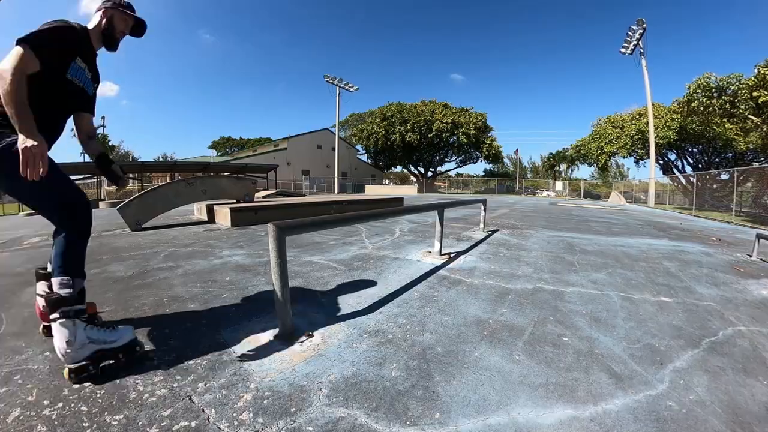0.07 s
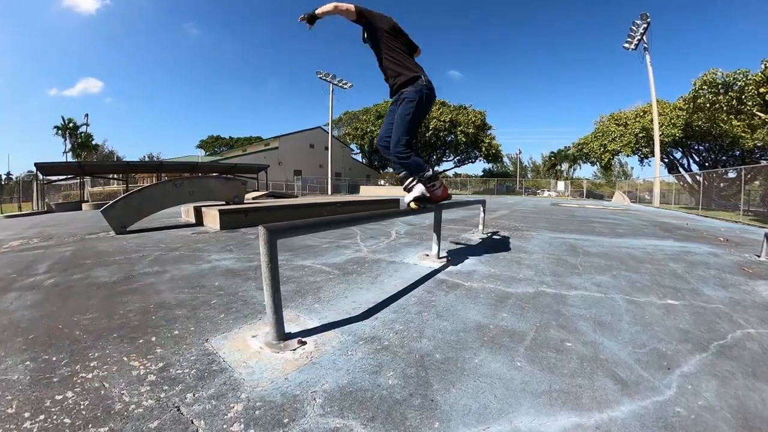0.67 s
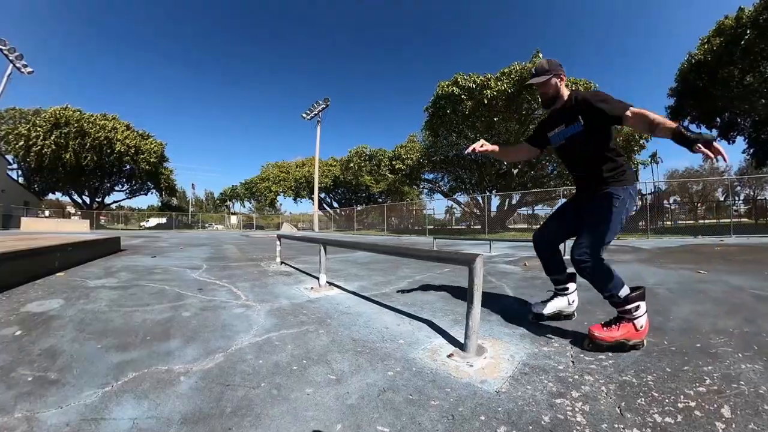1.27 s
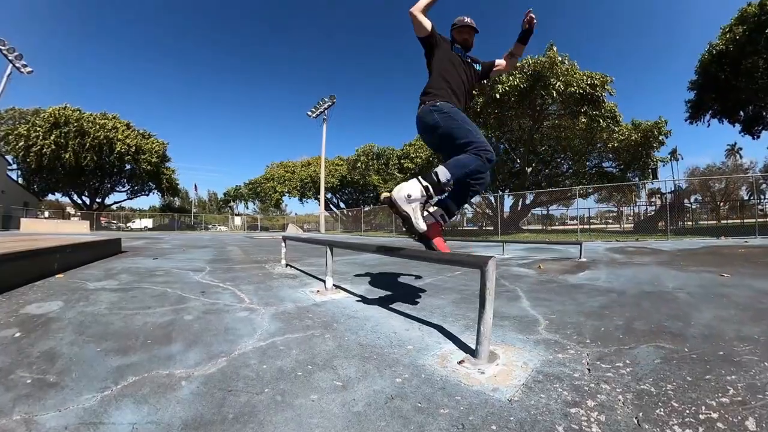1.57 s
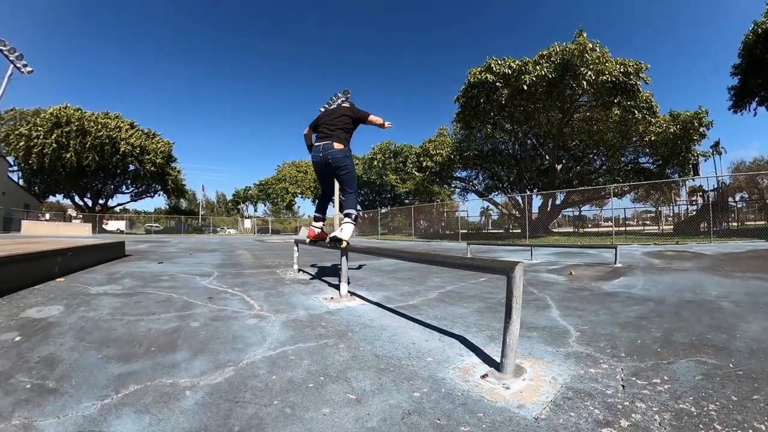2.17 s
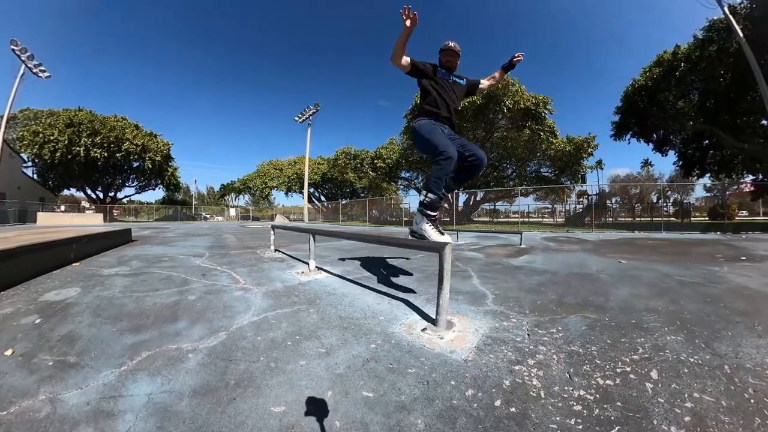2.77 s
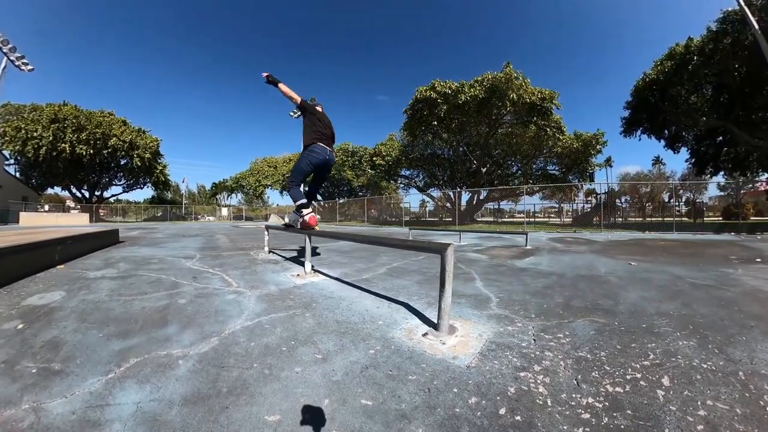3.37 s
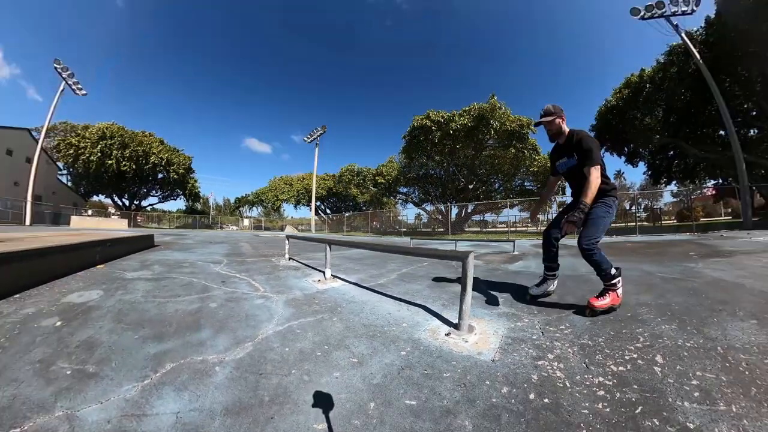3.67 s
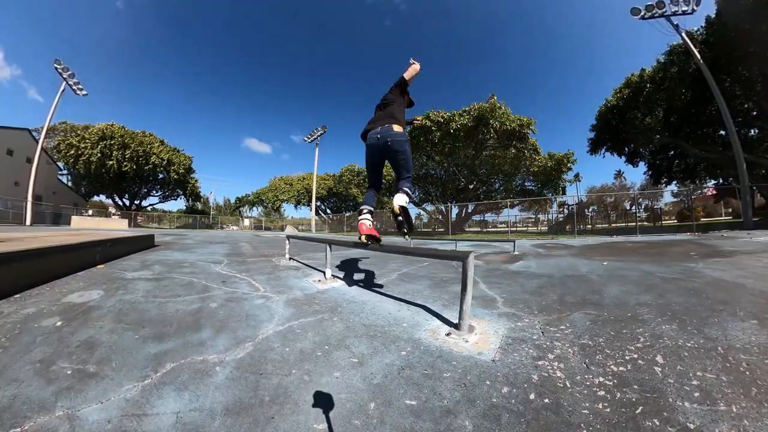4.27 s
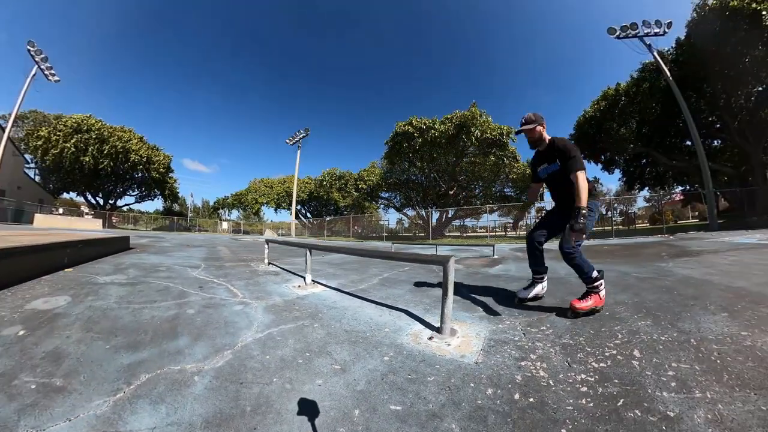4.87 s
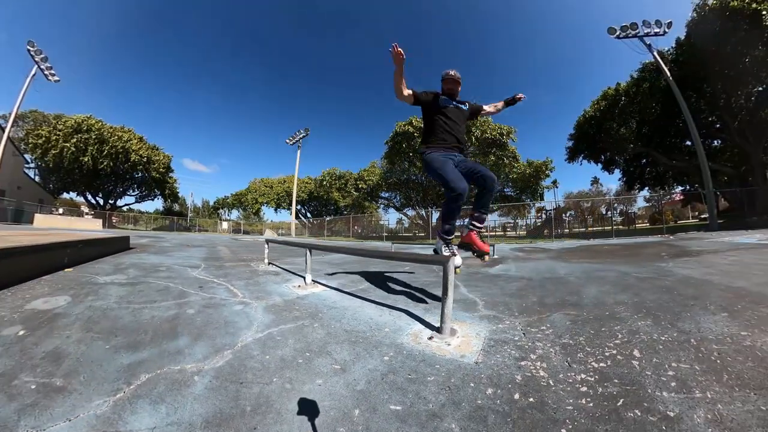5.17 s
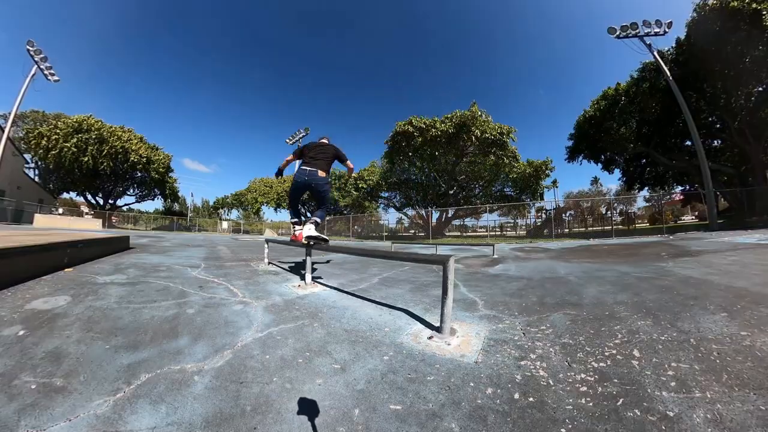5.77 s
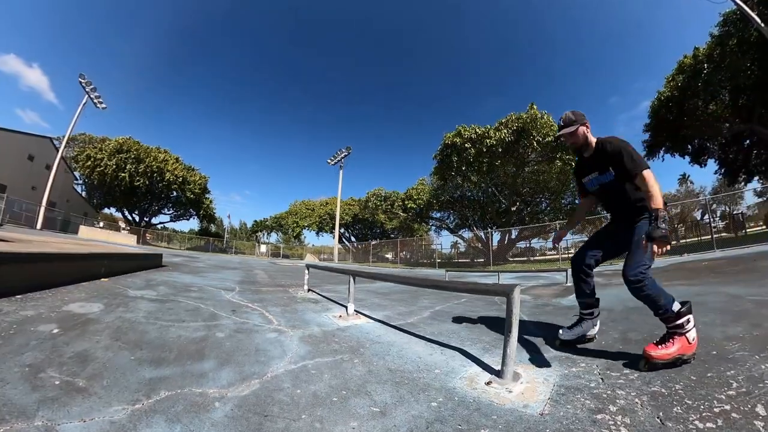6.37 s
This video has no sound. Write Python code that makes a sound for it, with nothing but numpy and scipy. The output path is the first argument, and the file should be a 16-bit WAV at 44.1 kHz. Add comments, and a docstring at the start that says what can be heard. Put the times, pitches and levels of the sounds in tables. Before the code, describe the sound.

Wind rumbles on the microphone as inline skates repeatedly hiss over concrete, thud onto a metal rail and scrape along it, sometimes squealing.

```python
"""An inline skater makes pass after pass at a steel rail in a windy concrete skatepark, in hard cuts.
Wind buffets the microphone throughout. Wheels hiss closer over gritty concrete and clack at take-off.
The skates thud onto the pipe, which rings, and grind along it while the free wheels spin.
From the second pass on, the soles also squeal in stick-slip.
A distant engine drones under the fifth pass and a last run-up."""
import sys
import numpy as np
from scipy import signal
from scipy.fft import rfft, irfft, next_fast_len
from scipy.io import wavfile

SR = 44100
rng = np.random.default_rng(int(sys.argv[2]) if len(sys.argv) > 2 else 0)


def master_out(mix):
    """Clip the mix to full scale and print it as 16-bit PCM to the path in sys.argv[1]."""
    frames = np.transpose(np.atleast_2d(mix))
    ceiling = np.clip(frames, -1, 1)
    pcm = np.round(ceiling * 32767).astype(np.int16)
    wavfile.write(sys.argv[1], SR, pcm)


N = 292383
TIME_S = np.arange(N) / SR

# Pass boundaries: time_s
CUTS_S = [0.075, 1.107, 2.338, 3.607, 4.873, 5.938, 6.7]
# One run-up a pass: jump_s, closest_db, approach_db_per_s, fizz_db, background_db
RUN_UPS = [(0.49, -44, 36, -9.5, -47.5), (1.56, -44, 51, -4.5, -52.5), (2.788, -38.5, 41, 0.5, -41.5),
           (4.071, -42, 72, -7.5, -52.5), (5.259, -43, 55, -5.5, -52), (6.8, -32.5, 37.5, -4, -38)]
# Wheels on concrete: freq_hz, level_db
ROLL_SPECTRUM = [(100, -1.5), (300, 0.5), (450, -4.5), (700, -7.5), (1100, -6.5), (1600, -7), (2200, -10),
                 (3100, -14.5), (4500, -23), (6600, -30.5), (7400, -37), (9000, -42), (13000, -62.5),
                 (15500, -82)]
# Skate set down to push off: start_s, level_db, t60_s
PUSH_OFF = (5.95, -33.5, 0.86)
# Wind strength: time_s, level_db
WIND_LEVELS = [(0.1, -41.5), (0.44, -34), (0.57, -45), (0.68, -35), (0.95, -42.5), (1.41, -27),
               (2.3, -41.5), (2.44, -21.5), (2.75, -33.5), (2.79, -19.5), (2.82, -28.5), (3.35, -27.5),
               (3.82, -40), (4.0, -27), (4.53, -36.5), (5.44, -35.5), (6.04, -23), (6.62, -29.5)]
# Large eddies: freq_hz, level_db
BUFFET_SPECTRUM = [(10, 1.5), (25, -0.5), (60, 0), (100, -3.5), (150, -14), (250, -32.5), (500, -85),
                   (2000, -110)]
# Gusts and wake: freq_hz, level_db
FLUTTER_SPECTRUM = [(60, -5), (130, 1.5), (190, -2), (280, -14.5), (450, -26.5), (900, -31), (2000, -65),
                    (6000, -110)]
# Unweighted frame taps: contact_s, level_db, pitch_hz, crack_db, t60_s
FRAME_TAPS = [(0.198, -29, 1550, -30, 0.02), (0.787, -27, 1170, -7, 0.017),
              (1.022, -37.5, 1300, -8.5, 0.015), (2.688, -28, 2150, 1, 0.023),
              (3.143, -12.5, 2690, -6, 0.012), (4.304, -20.5, 1800, -17, 0.022),
              (4.532, -12.5, 1100, -21, 0.0048), (4.568, -24.5, 1100, -11, 0.011),
              (4.745, -12, 1120, -31, 0.025)]
# Skates lifting in turn: first_s, second_s, first_db, second_db, pitch_hz, crack_db, wake_db
JUMPS = [(0.415, 0.471, -21, -19, 1287, -33, -46), (1.456, 1.515, -25, -22, 1260, -20.5, -41),
         (2.726, 2.784, -14.5, -23, 1593, -19.5, -37), (3.997, 4.053, -26, -22, 1220, -17, -25.5),
         (5.176, 5.242, -24, -22, 1380, -22, -49)]
# Skate resonances: pitch_ratio, level_db
SKATE_MODES = [(.8, -8), (1, 0), (1.2, -4), (1.42, -7), (1.9, -8)]
# First contact: freq_hz, level_db
CRACK_SPECTRUM = [(300, -29), (1000, 10.5), (2300, 13.5), (3500, 1.5), (4800, -1), (5900, -1.5),
                  (7200, -10), (10000, -32), (15000, -66)]
# Skate onto pipe: contact_s, clack_db, pitch_hz, crack_db, t60_s, thud_db,
# ring_db, tilt_db_per_octave, lift_hz, lift_db
RAIL_LANDINGS = [(0.762, -15, 950, -8, 0.022, -18.5, -27, -1, 745, 3),
                 (0.796, -19.5, 2350, -2, 0.028, -26, -22.5, -1, 1120, 5.5),
                 (1.796, -20.5, 840, -14, 0.014, -17.5, -26, -2.5, 3050, 10),
                 (1.855, -11.5, 2000, -11.5, 0.0091, -16.5, -21.5, -0.5, 3370, 9),
                 (1.968, -14, 1980, -9, 0.023, -38, -25, 1.5, 970, 9),
                 (2.967, -8, 1754, -12.5, 0.011, -7.5, -26, -4.5, 1390, -2),
                 (3.204, -17, 1040, -4, 0.028, -6.5, -16.5, 2.5, 1210, 5),
                 (3.381, -18.5, 1410, -3, 0.044, -14.5, -22, 2, 1400, 1),
                 (4.318, -13, 1120, -22, 0.027, -11.5, -19.5, 0, 3100, 7.5),
                 (4.583, -21, 1200, -19, 0.016, -22, -30.5, -4, 1100, 0),
                 (4.675, -25.5, 2630, -9.5, 0.012, -42, -32.5, -1, 2500, 0),
                 (4.713, -22, 2290, -4, 0.028, -27, -21.5, -2, 910, 6),
                 (4.729, -17, 1770, -17, 0.022, -17.5, -20, -1, 910, 1),
                 (5.498, -27, 1000, -14, 0.02, -31, -31.5, -13, 780, 18),
                 (5.528, -13, 1801, -22, 0.02, -19, -22, 2, 2993, 8.5),
                 (5.63, -21.5, 1840, -6, 0.025, -27, -20.5, 0.5, 1330, 9.5),
                 (5.647, -10.5, 1350, -11.5, 0.0092, -28, -22.5, 0, 1440, 8)]
# Boots and posts after landing: freq_hz, level_db
SHUDDER_SPECTRUM = [(30, -12), (90, -5.5), (170, 2.5), (280, -8), (450, -22), (900, -39), (4000, -92)]
# Strong pipe modes: freq_hz, level_db, t60_s
PIPE_MODES = [(368, 3, .36), (468, -3, .42), (527, -5, .35), (596, -4, .35), (764, -1, .38), (932, 1, .36),
              (1123, -1, .36), (1312, -3, .38), (1406, -2, .36), (1532, 1, .34), (1815, -1, .34),
              (1906, -2, .28), (2064, -7, .34), (2405, -6, .3), (2449, -7, .3), (2996, -6, .4),
              (3022, -3, .47), (3114, -7, .45), (3273, -6, .42), (3332, -4, .38), (3432, -7, .4),
              (3758, -10, .4), (4226, -8, .3), (4294, -7, .33), (4706, -13, .4), (5138, -13, .35),
              (5250, -12, .35), (6072, -11, .28), (6416, -10, .28), (8438, -20, .42)]
# Weak pipe modes: freq_hz, level_db
WEAK_MODE_SPECTRUM = [(150, -12), (200, 11), (330, -0.5), (600, 3.5), (950, 15.5), (1600, 4.5), (2300, 3.5),
                      (3300, -4.5), (4200, 0.5), (4520, -7.5), (5200, -4.5), (6400, -10.5), (7900, -25),
                      (8500, -19), (11000, -41), (15500, -61)]
# Their decay: freq_hz, t60_s
WEAK_MODE_DECAY = [(200, 0.36), (1000, 0.13), (3200, 0.35), (6000, 0.27), (12000, 0.51)]
# Sole on steel: freq_hz, level_db
SCRAPE_SPECTRUM = [(100, -9), (250, 2), (600, -1), (1300, -2.5), (2200, -5.5), (3200, -1.5), (4500, -12),
                   (6500, -20.5), (8000, -27.5), (11000, -32.5), (15500, -60)]
# Slides along the pipe: start_s, slide_db, fade_db_per_s, bite_db, spin_db
SLIDES = [(0.774, -46, 14, -22.5, -56), (1.801, -39.5, 30, -24, -53), (2.97, -30.5, 21.5, -43, -47),
          (4.303, -40.5, 28, -26.5, -59), (4.705, -52, 30, -26, -67.5), (5.5, -34.5, 36, -46, -55)]
# Free-spinning wheels: freq_hz, level_db
BEARING_SPECTRUM = [(1500, -4), (4000, 1), (6500, -5.5), (7400, -8), (9000, -17), (11000, -22),
                    (15500, -50)]
# Sole chatter on the pipe wall: start_s, level_db, t60_s
SOLE_SQUEALS = [(1.815, -34, 0.49), (1.912, -31, 0.21), (2.006, -25.5, 0.36), (3.489, -45, 1),
                (4.432, -40, 0.39), (4.801, -39.5, 0.6), (5.535, -38, 0.45)]
# Distant engine: time_s, pitch_hz, level_db
ENGINE_TRACK = [(4.86, 113, -63), (4.89, 112.4, -32.5), (5.1, 115.4, -31.5), (5.35, 114.7, -31.5),
                (5.65, 115.4, -28), (5.9, 116, -33), (6.1, 112.5, -31), (6.4, 111, -28),
                (6.63, 110.5, -32.5)]

WALL_HZ, BUILD_S = 3060, 0.014  # pipe wall resonance; swell after a landing
RUB_LEAD_S = 1 / 20


def gain_of(db):
    """Decibels to amplitude."""
    return 10 ** (np.asarray(db) / 20)


def unit_rms(x):
    """Scales to rms 1."""
    return x / np.sqrt(np.mean(x ** 2) + 1e-20)


def value_at(spectrum, hz):
    """Interpolates on a log frequency axis."""
    freq_hz, value = np.transpose(spectrum)
    return np.interp(np.log(hz + 1), np.log(freq_hz + 1), value)


def coloured(x, spectrum):
    """Filters x by (freq_hz, level_db) points; rms 1."""
    size = next_fast_len(len(x))
    gains = gain_of(value_at(spectrum, np.fft.rfftfreq(size, 1 / SR)))
    return unit_rms(irfft(rfft(x, size) * gains, size)[:len(x)])


def noise(spectrum, samples=N):
    """Coloured noise, rms 1."""
    return coloured(rng.standard_normal(samples), spectrum)


def add(mix, start_s, sound):
    """Mixes a sound in, cut off at the end of its pass."""
    end_s = next(cut_s for cut_s in CUTS_S if cut_s > start_s)
    part = mix[round(start_s * SR):round(end_s * SR)][:len(sound)]
    part += sound[:len(part)]


def grit(rate_per_s, spread_db, share=0.7):
    """Smooth friction noise plus tiny impacts of uneven size."""
    sizes = gain_of(spread_db * np.minimum(rng.exponential(1, N), 4)) * rng.choice([-1, 1], N)
    smooth = rng.standard_normal(N)
    impacts = unit_rms(sizes * (rng.random(N) < rate_per_s / SR))
    return unit_rms(smooth + share * impacts)


def wheels(level_db=1, patchy_db=0.85, fizz_boost_db=11, closest_lead_s=0.14, lift_db_per_s=308):
    """Wheels crunch over patchy concrete, louder as they near, until the jump."""
    out = np.zeros(N)
    crunch = grit(rate_per_s=900, spread_db=4)
    patches = noise([(0, 0), (60, 0), (200, -30), (800, -90)])
    rolling = coloured(crunch * gain_of(patchy_db * patches), ROLL_SPECTRUM)
    treble = signal.sosfiltfilt(signal.butter(2, 3500, "highpass", fs=SR, output="sos"), rolling)
    body, fizz = rolling - treble, gain_of(fizz_boost_db) * treble
    for start_s, end_s, run_up in zip(CUTS_S, CUTS_S[1:], RUN_UPS):
        jump_s, closest_db, approach_db_per_s, fizz_db, background_db = run_up
        span = (TIME_S >= start_s) & (TIME_S < end_s)
        t = TIME_S[span]
        distance_db = approach_db_per_s * np.maximum(jump_s - closest_lead_s - t, 0)
        near = gain_of(closest_db - distance_db - lift_db_per_s * np.maximum(t - jump_s, 0))
        body_gain = np.hypot(near, gain_of(background_db))
        fizz_gain = np.hypot(near * gain_of(fizz_db), gain_of(background_db - 8.5))
        add(out, start_s, body_gain * body[span] + fizz_gain * fizz[span])
    start_s, db, t60_s = PUSH_OFF
    t = TIME_S[:SR]
    push = (body + gain_of(-2) * fizz)[:SR]
    add(out, start_s, push * gain_of(db - 60 * t / t60_s) * np.minimum(t / 0.043, 1))
    return gain_of(level_db) * out


def wind(buffet_db=2, flutter_db=-8, gust_db=2, usual_db=-30, wake_lag_s=0.015, wake_width_s=0.11):
    """Large eddies thump the microphone; gusts and the skater's wake add quicker flutter."""
    db = np.interp(TIME_S, *np.transpose(WIND_LEVELS))
    gusts = gain_of(gust_db * noise([(0, -30), (4, -12), (8, 0), (16, 0), (40, -30), (200, -100)]))
    wake = sum(gain_of(wake_db) * np.exp(-((TIME_S - jump_s - wake_lag_s) / wake_width_s) ** 2)
               for _, jump_s, *_, wake_db in JUMPS)
    breeze = gain_of(usual_db + 0.65 * (db - usual_db) + flutter_db)
    buffet = gain_of(db + buffet_db) * noise(BUFFET_SPECTRUM)
    flutter = np.hypot(breeze, wake) * noise(FLUTTER_SPECTRUM)
    return (buffet + flutter) * gusts * np.clip((TIME_S - CUTS_S[0]) / .01, 0, 1)


def rub(db, hz, lead_t60_s, fade_t60_s=0.045):
    """Urethane scrubs as the wheels load and unload; peaks RUB_LEAD_S in."""
    lead = round(RUB_LEAD_S * SR)
    t = np.arange(-lead, lead) / SR
    band = [(hz * .06, -45), (hz * .25, -18), (hz * .7, -5), (hz * 1.2, 0),
            (hz * 1.8, -5), (hz * 3.5, -19), (hz * 9, -52)]
    return gain_of(db - 60 * np.maximum(-t / lead_t60_s, t / fade_t60_s)) * noise(band, len(t))


def clack(db, hz, crack_db, knock_db, t60_s, max_t60_s=0.026, crack_t60_s=0.014, boot_hz=687):
    """Hard plastic: damped modes, a hollow boot knock, a rough crack on top."""
    t = np.arange(int(.06 * SR)) / SR

    def at_onset(x, onset_db):
        """Sets the rms of the first 2 ms."""
        return gain_of(onset_db) * x / np.sqrt(np.mean(x[t < .002] ** 2))

    damping = gain_of(-60 * t / min(t60_s, max_t60_s))
    # neighbouring modes oppose, so the sound takes a cycle to open
    body = damping * sum((-1) ** k * gain_of(mode_db) * np.sin(2 * np.pi * hz * ratio * t)
                         for k, (ratio, mode_db) in enumerate(SKATE_MODES))
    knock = damping * np.sin(2 * np.pi * boot_hz * rng.uniform(0.76, 1.16) * t)
    highpass = signal.butter(2, hz, "highpass", fs=SR, output="sos")
    crack = signal.sosfilt(highpass, noise(CRACK_SPECTRUM, len(t))) * gain_of(-60 * t / crack_t60_s)
    attack = np.sin(np.pi / 2 * np.minimum(t / .0007, 1)) ** 2
    sound = at_onset(body, -4) + at_onset(knock, knock_db - 1) + at_onset(crack, crack_db + 7)
    return gain_of(db) * attack * sound


def strike(db, hz, crack_db, t60_s, knock_db, rub_db, lead_t60_s):
    """A clack at the peak of the wheels' scrub."""
    scrub = rub(min(db, -20) + rub_db, hz, lead_t60_s)
    hit = clack(db, hz, crack_db, knock_db, t60_s)
    return np.pad(scrub, (0, len(hit))) + np.pad(hit, len(scrub) // 2)


def thud(db, t60_s=0.044, shudder_t60_s=0.41, db_per_octave=29.5):
    """Weight comes down: a low push, lower if heavier; boots and posts shudder."""
    t = np.arange(SR // 2) / SR
    pitch_hz = 109.5 * 2 ** (-db / db_per_octave)
    push = -gain_of(db - 60 * t / t60_s) * np.sin(2 * np.pi * pitch_hz * t)
    shudder = noise(SHUDDER_SPECTRUM, len(t)) * np.minimum(t / BUILD_S, 1)
    return push + gain_of(min(db, -12) - 11 - 60 * t / shudder_t60_s) * shudder


def skates(heel_lead_s=0.0067, heel_db=-8.5, jump_knock_db=-14.5, jump_t60_s=0.026):
    """Frames clack at take-off, heel first, in glancing taps, and on landing with a thud."""
    out = np.zeros(N)
    for first_s, second_s, first_db, second_db, hz, crack_db, _ in JUMPS:
        for at_s, db in (first_s, first_db), (second_s, second_db):
            add(out, at_s - heel_lead_s, clack(db + heel_db, hz, crack_db, jump_knock_db, jump_t60_s))
            hit = strike(db, hz, crack_db, jump_t60_s, jump_knock_db, rub_db=-13.5, lead_t60_s=0.027)
            add(out, at_s - RUB_LEAD_S, hit)
    for at_s, db, hz, crack_db, t60_s in FRAME_TAPS:
        hit = strike(db, hz, crack_db, t60_s, knock_db=-7, rub_db=-17, lead_t60_s=0.035)
        add(out, at_s - RUB_LEAD_S, hit)
    for at_s, db, hz, crack_db, t60_s, thud_db, *_ in RAIL_LANDINGS:
        hit = strike(db, hz, crack_db, t60_s, knock_db=-7.5, rub_db=-16, lead_t60_s=0.034)
        add(out, at_s - RUB_LEAD_S, hit)
        add(out, at_s, thud(thud_db))
    return out


def park_echo(x, level_db=-24, t60_s=0.27):
    """Ramps and walls scatter a faint, dull echo."""
    t = np.arange(SR // 2) / SR
    tail = noise([(100, 27), (1500, -19), (5000, -6), (12000, -33.5)], len(t))
    tail *= gain_of(-60 * t / t60_s) * (t > .004)
    return gain_of(level_db) * signal.oaconvolve(x, tail / np.linalg.norm(tail))[:N]


def pipe_modes(weak_db=-8, count=300):
    """Strong and weak modes of the steel pipe as decaying phasors."""
    weak_hz = 150 + (np.arange(count) + rng.random(count)) * 14000 / count
    weak = [weak_hz, value_at(WEAK_MODE_SPECTRUM, weak_hz) + weak_db, value_at(WEAK_MODE_DECAY, weak_hz)]
    hz, db, t60_s = np.vstack([PIPE_MODES, np.transpose(weak)]).T
    t = np.arange(SR // 2, dtype=np.float32) / SR
    poles = (2j * np.pi * hz - np.log(1000) / t60_s).astype(np.complex64)
    return hz, gain_of(db), np.exp(np.outer(poles, t))


def contact_colour(tilt_db_per_octave, lift_hz, lift_db, width_hz=330):
    """Spectrum of a contact: modes with a node near the spot stay quiet."""
    hz = np.arange(100, 16000, 40)
    ripples = np.sin(2 * np.pi * (hz[:, None] / np.geomspace(330, 900, 8) + rng.random(8)))
    nodes_db = 3.5 * unit_rms(ripples.sum(1)) * np.minimum(hz / 2000, 1)
    bump_db = lift_db * np.exp(-((hz - lift_hz) / width_hz) ** 2)
    tilt_db = tilt_db_per_octave * np.log2(np.clip(hz, 400, 6000) / 1500)
    return np.transpose([hz, tilt_db + bump_db + nodes_db])


def ring(pipe, colour, scatter_db=2):
    """The pipe after a blow; each blow excites the modes differently."""
    hz, gains, phasors = pipe
    shares = gains * gain_of(value_at(colour, hz) + scatter_db * rng.standard_normal(len(hz)))
    phases = np.exp(2j * np.pi * rng.random(len(hz)))
    sound = ((shares * phases).astype(np.complex64) @ phasors).real
    sound = sound * np.minimum(TIME_S[:len(sound)] / .002, 1)
    return sound / np.sqrt(np.mean(sound[:SR // 25] ** 2))


def rail(pipe, level_db=-1, scuff_db=-8, scuff_t60_s=0.28, usual_db=-20, doubling_db=16):
    """Bending waves spread along the steel: the ring swells after each blow, over the sole's scuff."""
    out, t = np.zeros(N), np.arange(SR // 2) / SR
    for at_s, *_, ring_db, tilt_db_per_octave, lift_hz, lift_db in RAIL_LANDINGS:
        colour = contact_colour(tilt_db_per_octave, lift_hz, lift_db)
        build_s = BUILD_S * 2 ** ((ring_db - usual_db) / doubling_db)  # harder blows swell longer
        scuff = coloured(noise(SCRAPE_SPECTRUM, len(t)), colour)
        scuff *= gain_of(scuff_db - 60 * t / scuff_t60_s)
        swell = gain_of(ring_db + level_db) * np.minimum(t / build_s, 1)
        add(out, at_s, swell * (ring(pipe, colour) + scuff))
    return out


def sole_pressure(rise_s=0.016, hold_s=0.035, bite_t60_s=0.33, wobble_db=1.5):
    """A sole bites as it locks on, then slides away under a wobbling load."""
    out, t = np.zeros(N), np.arange(SR) / SR
    for start_s, slide_db, fade_db_per_s, bite_db, _ in SLIDES:
        bite = gain_of(bite_db - 60 * np.maximum(t - hold_s, 0) / bite_t60_s)
        slide = gain_of(slide_db - fade_db_per_s * t)
        add(out, start_s, np.hypot(bite, slide) * np.minimum(t / rise_s, 1))
    wobble = noise([(0, -20), (10, 0), (50, 0), (150, -30), (600, -90)])
    return out * gain_of(wobble_db * wobble)


def grind(pipe, ring_db=2, level_db=-1):
    """Sliding soles scrape and keep the pipe singing."""
    friction = grit(rate_per_s=1300, spread_db=9)
    colour = contact_colour(tilt_db_per_octave=-1.5, lift_hz=WALL_HZ, lift_db=6)
    singing = unit_rms(signal.oaconvolve(friction, ring(pipe, colour))[:N])
    scrape = coloured(friction, SCRAPE_SPECTRUM)
    return gain_of(level_db) * sole_pressure() * unit_rms(scrape + gain_of(ring_db) * singing)


def bearings(swell_s=0.25):
    """Thin hiss of wheels spinning in the air during each grind."""
    envelope, t = np.zeros(N), np.arange(SR) / SR
    for start_s, *_, spin_db in SLIDES:
        add(envelope, start_s, gain_of(spin_db) * np.minimum(t / swell_s, 1))
    return envelope * noise(BEARING_SPECTRUM)


def squeals(sink_hz=240, sink_s=0.036, half_width_hz=170, rise_s=0.0091):
    """Stick-slip locks onto the pipe wall's resonance; pitch sinks as the sole slows."""
    out, t = np.zeros(N), np.arange(SR // 2) / SR
    pitch_hz = WALL_HZ + sink_hz * np.exp(-t / sink_s)
    carrier = np.exp(2j * np.pi * np.cumsum(pitch_hz) / SR)
    lowpass = signal.butter(3, half_width_hz, fs=SR, output="sos")
    for start_s, db, t60_s in SOLE_SQUEALS:
        real, imag = signal.sosfilt(lowpass, rng.standard_normal((2, len(t))))
        chatter = unit_rms(((real + 1j * imag) * carrier).real)
        add(out, start_s, chatter * gain_of(db - 60 * t / t60_s) * np.minimum(t / rise_s, 1))
    return out


def engine(octave_db=-14, waver_ratio=0.0067):
    """A far engine: one wavering low note and its octave."""
    time_s, pitch_hz, level_db = np.transpose(ENGINE_TRACK)
    waver = noise([(0, 3), (5, 0.5), (20, -54), (60, -120)])
    hz = np.interp(TIME_S, time_s, pitch_hz) * (1 + waver_ratio * waver)
    phase = 2 * np.pi * np.cumsum(hz) / SR
    envelope = gain_of(np.interp(TIME_S, time_s, level_db)) * (TIME_S > time_s[0])
    return envelope * unit_rms(np.sin(phase) + gain_of(octave_db) * np.sin(2 * phase))


def scene():
    """Skates, rail, concrete, wind and engine at one microphone."""
    hits, pipe = skates(), pipe_modes()
    on_rail = rail(pipe) + grind(pipe) + bearings() + squeals()
    return (wheels() + wind() + hits + park_echo(hits) + on_rail + engine())[None]


def record(dry, edge_hz=15750):
    """The microphone rounds off the hardest peaks, then limits the band."""
    rounded = dry / (1 + dry ** 4) ** .25
    lowpass = signal.firwin(511, edge_hz, window=("kaiser", 9), fs=SR)
    return signal.oaconvolve(rounded, lowpass[None], "same")


dry = scene()
out = record(dry)
master_out(out)
```